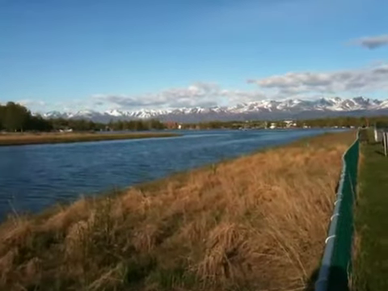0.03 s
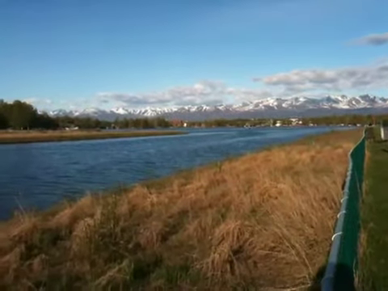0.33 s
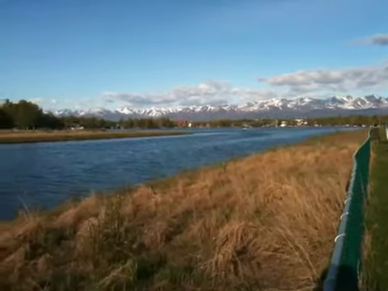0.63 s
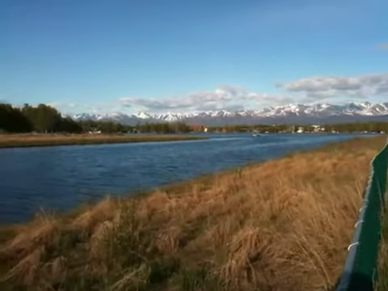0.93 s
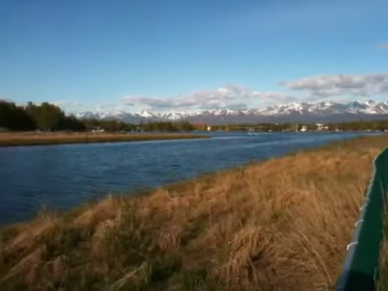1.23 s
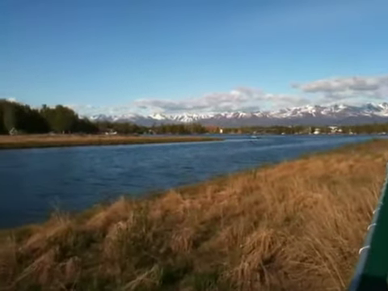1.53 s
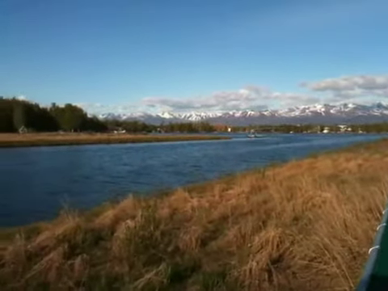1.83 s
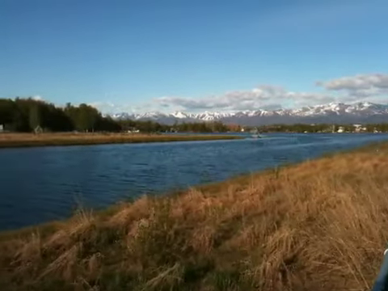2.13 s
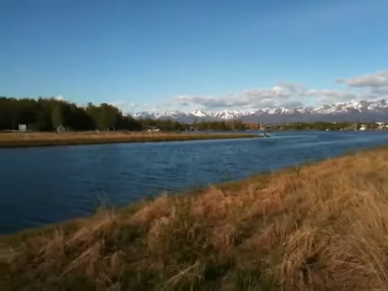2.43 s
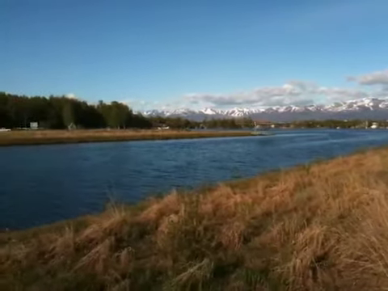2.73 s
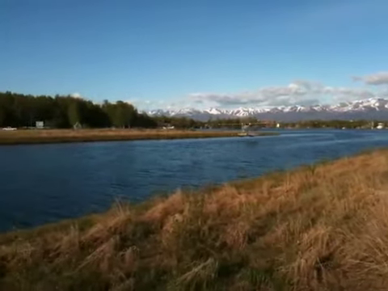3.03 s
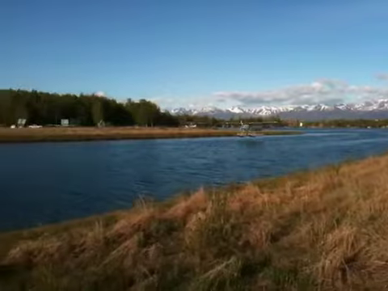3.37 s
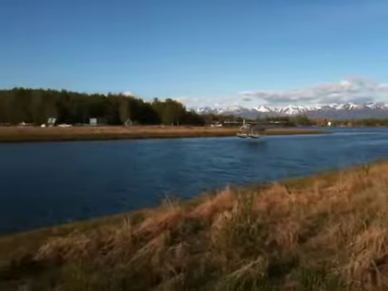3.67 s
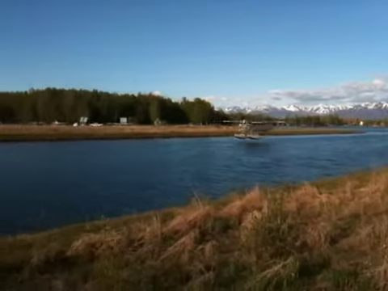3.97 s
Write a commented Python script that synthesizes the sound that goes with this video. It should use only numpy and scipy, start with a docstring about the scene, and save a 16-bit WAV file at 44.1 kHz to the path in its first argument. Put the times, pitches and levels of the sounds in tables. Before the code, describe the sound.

A floatplane's low engine hum and propeller hiss grow louder under thumping gusts of wind.

```python
"""A low engine drone, hit at once by puffs of wind on the microphone.
A small floatplane taxis nearer across a lake, easing its throttle; each firing pops in its exhaust pipe.
Propeller and spray hiss swells, pulsing with the engine. Another engine idles far off and fades.
Wind eddies rumble, crack and thump. Behind: open-air noise, one rustle of dry grass, one faint tick.
The camera adds a faint high whine."""
import sys
import numpy as np
from scipy import signal
from scipy.fft import rfft, irfft, next_fast_len
from scipy.io import wavfile
from scipy.ndimage import map_coordinates

SR = 44100
rng = np.random.default_rng(int(sys.argv[2]) if len(sys.argv) > 2 else 0)


def master(y):
    """Save y as 16-bit WAV."""
    cut = np.clip(np.atleast_2d(y).T, -1, 1)
    pcm = np.round(cut * 32767)  # scale
    wavfile.write(sys.argv[1], SR, pcm.astype(np.int16))


N = 176400

# plane's firing rate: t/s, f/Hz
FIRING_HZ = [(0, 105.2), (2.3, 103.5), (3.2, 101.9), (3.7, 99.6)]
# exhaust tones: multiple of the firing rate; level/dB re rumble
TONE_ORDERS = [1, 2, 8 / 3, 3, 4]
TONE_DB = [-8, 0.5, -14.5, -18, -17.5]
# exhaust gain as the plane nears: t/s, level/dB
APPROACH_DB = [(0, -54), (1, -50.5), (2, -49.5), (2.9, -47), (3.3, -44), (3.7, -41), (4, -41)]
# exhaust rumble spectrum: f/Hz, level/dB
EXHAUST_COLOUR = [(40, -46), (80, -25), (110, -2), (190, 3.5), (330, -12), (520, -7.5), (800, -5.5),
                  (1050, -16.5), (3000, -52)]
# far engine's tones: multiple of its firing rate, starting level/dB
IDLE_ORDERS = [(2, -50.5), (3, -61), (4, -57), (5, -57), (7, -63.5), (9, -61), (11, -65.5)]
# open-air and grass spectra: f/Hz, level/dB
AIR_COLOUR = [(40, -16), (130, 3.5), (500, 0), (800, -16.5), (1200, -6), (2500, -29.5), (11000, -41),
              (15500, -31)]
GRASS_COLOUR = [(1500, -11), (4500, 3), (8000, 1), (15000, -15)]
# grass rustle: centre t/s, half length/s, level/dB
GRASS_RUSTLE = (0.576, 0.11, -62.5)
# nearby tick: t/s, level/dB
NEAR_TICKS = [(3.425, -41)]
# wind puffs: centre t/s, length/s, level/dB, brightness/dB
WIND_PUFFS = [(0.064, 0.032, -29.5, -26), (0.554, 0.019, -37, -30), (0.754, 0.046, -27, -11),
              (1.043, 0.028, -30.5, -11.5), (1.12, 0.073, -28.5, -18), (1.235, 0.011, -27.5, -5),
              (1.274, 0.056, -28.5, -16.5), (1.32, 0.034, -25.5, -20), (1.405, 0.031, -26.5, -17),
              (1.528, 0.056, -35.5, -16), (1.762, 0.043, -30, -22), (1.86, 0.014, -32.5, -15),
              (2.041, 0.015, -29, -20), (2.165, 0.018, -25, -37), (2.201, 0.037, -27, -18),
              (2.292, 0.058, -29, -17.5), (2.351, 0.026, -24.5, -14.5), (2.395, 0.025, -28, -10),
              (2.453, 0.048, -26.5, -8.5), (2.545, 0.044, -30.5, -12), (2.623, 0.049, -29.5, -20),
              (2.714, 0.033, -29.5, -8), (2.902, 0.042, -38, -25), (3.391, 0.036, -26, -10.5),
              (3.445, 0.024, -24.5, -10), (3.528, 0.018, -28.5, -10.5), (3.635, 0.044, -25, -7.5)]
# spectra of a puff's layers: f/Hz, level/dB
BODY_COLOUR = [(25, -57), (75, -17), (120, 1), (180, 4.5), (260, 0), (400, -9.5), (800, -35.5), (2000, -80)]
EDGE_COLOUR = [(150, -22), (350, 7.5), (550, 8), (1100, -18.5), (1500, -39), (6000, -94)]
CRACK_COLOUR = [(550, 4), (950, 4.5), (1400, -8), (2200, -28.5), (5000, -45)]
# light buffeting between puffs: t/s, level/dB
BREEZE_DB = [(.9, -58.5), (1.5, -46.5), (2.5, -46), (2.8, -48.5), (3.06, -43.5), (3.25, -56.5),
             (3.55, -42.5), (4, -53)]
# hiss band envelopes: t/s, level/dB
MID_DB = [(0, -72.5), (.55, -72), (.7, -64.5), (1.2, -67.5), (1.55, -60), (2.5, -56), (3.2, -57),
          (3.45, -51), (4, -50.5)]
TREBLE_DB = [(.42, -72), (.85, -65), (1.4, -68.5), (1.58, -62), (1.75, -65), (2.02, -55.5), (2.4, -58),
             (2.9, -53), (3.03, -57), (3.55, -49), (3.78, -52.5), (4, -47.5)]
TOP_DB = [(.4, -77), (.7, -71), (1.65, -69.5), (2.07, -56), (2.38, -63), (2.53, -54.5), (2.62, -61.5),
          (2.92, -55), (3, -60.5), (3.3, -52), (3.68, -50.5), (3.78, -56), (4, -45.5)]
FIZZ_DB = [(1.6, -76.5), (3, -70), (3.4, -62.5), (4, -59.5)]
# hiss band spectra: f/Hz, level/dB
MID_BAND = [(600, -30), (1250, -0.5), (2200, 0.5), (2600, -8), (4500, -50)]
TREBLE_BAND = [(2200, -69), (3400, 2.5), (4600, 4), (5700, -6.5), (7500, -62)]
TOP_BAND = [(4800, -22), (6400, 2.5), (7400, 2.5), (9000, -12), (13000, -49)]
FIZZ_BAND = [(6500, -6), (9000, 1), (10700, -1), (12000, -5), (15500, -27)]
# hard buffets: onset t/s, level/dB, f/Hz
WIND_THUMPS = [(1.043, -22, 317), (1.089, -18, 208), (1.23, -28, 840), (1.277, -25, 770), (1.759, -20, 257),
               (2.446, -18, 604), (2.662, -15, 200), (2.681, -22.5, 326), (3.423, -15.5, 383),
               (3.472, -17, 197), (3.629, -14.5, 190)]


def amp(db):
    return 10 ** (np.asarray(db) / 20)


def unit_rms(x):
    return x / np.sqrt(np.mean(x ** 2) + 1e-20)


def time_s():
    return np.arange(N) / SR


def curve(rows):
    """(t/s, value) rows, interpolated per sample."""
    return np.interp(time_s(), *np.transpose(rows))


def wobble(rate_hz):
    """Smooth random curve through normal knots at rate_hz."""
    t = time_s()
    coarse_s = t[::32]
    knots = rng.standard_normal(N // 100)
    return np.interp(t, coarse_s, map_coordinates(knots, [coarse_s * rate_hz + 2]))


def filtered(x, gain_at_hz):
    size = next_fast_len(N + 8192)
    return irfft(rfft(x, size) * gain_at_hz(np.fft.rfftfreq(size, 1 / SR)), size)[:N]


def coloured(x, colour):
    """x shaped by (f/Hz, level/dB) rows, at rms 1."""
    hz, db = np.transpose(colour)
    return unit_rms(filtered(x, lambda f: amp(np.interp(np.log(f + 1), np.log(hz), db))))


def noise(colour):
    return coloured(rng.standard_normal(N), colour)


def tone(cycles, rms_db, waver_rad, waver_hz):
    """Sine with a random, wavering phase."""
    phase_rad = 2 * np.pi * (cycles + rng.random()) + waver_rad * wobble(waver_hz)
    return amp(rms_db) * np.sqrt(2) * np.sin(phase_rad)


def pops(firings, colour, scatter_db=6, pipe_t60_s=0.034, waver_db=2.5):
    """One uneven pulse per firing, ringing in the pipe, heard along two wavering paths."""
    onsets = np.flatnonzero(np.diff(np.floor(firings)))
    pulses = np.zeros(N)
    pulses[onsets] = amp(scatter_db * rng.standard_normal(len(onsets)))
    decay = amp(-60 * time_s()[:SR // 20] / pipe_t60_s)
    paths = rng.standard_normal((2, len(decay))) * decay
    ringing = sum(signal.fftconvolve(pulses, path)[:N] * amp(waver_db * wobble(20)) for path in paths)
    return coloured(ringing, colour)


def exhaust(firings, rush_share=0.71, rush_swing_db=2, waver_db=2):
    """Low engine orders over a rumble of pipe pops and noise that pulses with each firing."""
    tones = sum(tone(order * firings, db + waver_db * wobble(16), waver_rad=0.32, waver_hz=14)
                for order, db in zip(TONE_ORDERS, TONE_DB))
    ring = pops(firings, EXHAUST_COLOUR)
    pulsing = amp(rush_swing_db * np.cos(2 * np.pi * firings))
    rush = coloured(rng.standard_normal(N) * pulsing, EXHAUST_COLOUR)
    rumble = np.sqrt(1 - rush_share) * ring + np.sqrt(rush_share) * rush
    return amp(curve(APPROACH_DB)) * (tones + rumble)


def far_engine(firing_hz=55.34, fade_db_per_s=4, waver_db=4):
    """A fading idle whose tones waver on their way over the water."""
    t = time_s()
    firings = firing_hz * t + 0.055 * wobble(3.29)
    idle = np.zeros(N)
    for order, start_db in IDLE_ORDERS:
        level_db = start_db - fade_db_per_s * t + waver_db * wobble(4.86)
        idle += tone(order * firings, level_db, waver_rad=0.4, waver_hz=7.67)
    return idle


def shore(air_db=-57, tick_decay_s=0.0012):
    """Distant open-air noise; a grass rustle and a tick share one brighter noise."""
    t = time_s()
    centre_s, half_s, rustle_db = GRASS_RUSTLE
    rustle = amp(rustle_db + 2.2 * wobble(88.8)) * np.exp(-((t - centre_s) / half_s) ** 2)
    tick = sum(amp(db) * np.exp(-np.abs(t - at_s) / tick_decay_s) for at_s, db in NEAR_TICKS)
    return (rustle + tick) * noise(GRASS_COLOUR) + amp(air_db + wobble(3.76)) * noise(AIR_COLOUR)


def eddies(colour, window_s):
    """Turbulent noise, levelled over window_s so that the puff sets its strength."""
    turbulence = noise(colour)
    power = signal.fftconvolve(turbulence ** 2, np.hanning(int(window_s * SR)), "same")
    return unit_rms(turbulence / np.sqrt(np.abs(power) + 1e-9))


def wind(body_gain_db=-0.5, edge_gain_db=2.5, flutter_db=3, steepness=2.54):
    """Puffs buffet the microphone; sharper ones add a bright edge, the sharpest a crack."""
    t = time_s()
    body_power = amp(curve(BREEZE_DB) + 4.7 * wobble(27.91)) ** 2
    edge_power, crack_power = np.zeros((2, N))
    for centre_s, length_s, db, bright_db in WIND_PUFFS:
        span = slice(*np.searchsorted(t, [centre_s - 2 * length_s, centre_s + 2 * length_s]))
        offset = np.abs(2 * (t[span] - centre_s) / length_s)
        crest = np.exp(-(offset / 0.75) ** steepness)  # 3/4 of the body's length
        body_power[span] += amp(db) ** 2 * np.exp(-offset ** steepness)
        edge_power[span] += amp(db + bright_db) ** 2 * crest
        crack_power[span] += amp(db + 1.8 * bright_db) ** 2 * crest
    edge = amp(edge_gain_db) * np.sqrt(edge_power) * eddies(EDGE_COLOUR, window_s=0.031)
    crack = np.sqrt(crack_power) * eddies(CRACK_COLOUR, window_s=0.016)
    body = amp(body_gain_db) * np.sqrt(body_power) * eddies(BODY_COLOUR, window_s=0.034)
    return body + amp(flutter_db * wobble(130)) * (edge + crack)


def hiss(firings, pulse_db=1.5, flutter_db=0.8, waver_db=1.13, rasp_gain_db=-2):
    """Propeller wash and spray: four fluttering bands pulse with the engine; firings rasp in the mids."""
    firing_rad = 2 * np.pi * firings
    swing_db = pulse_db * (np.cos(2 * firing_rad) / 2 - np.cos(firing_rad))
    swing_db += 0.62 * np.sin(firing_rad / 2)  # every second firing
    swing_db -= 0.04 * np.sin(firing_rad * 2 / 3)  # blade passes
    rasp = amp(curve(MID_DB) + rasp_gain_db) * pops(firings, MID_BAND)
    bands = [(MID_DB, MID_BAND), (TREBLE_DB, TREBLE_BAND), (TOP_DB, TOP_BAND), (FIZZ_DB, FIZZ_BAND)]
    wash = np.zeros(N)
    for envelope_db, colour in bands:
        level_db = curve(envelope_db) + flutter_db * wobble(260) + waver_db * wobble(14)
        wash += amp(level_db) * noise(colour)
    return rasp + unit_rms(amp(swing_db)) * wash


def thumps(rise_cycles=0.6):
    """The hardest eddies shove the microphone; each swing dies within a few cycles."""
    t = time_s()
    shoves = np.zeros(N)
    for onset_s, db, hz in WIND_THUMPS:
        cycles = np.maximum(t - onset_s, 0) * hz
        rise = cycles / rise_cycles
        shoves += amp(db) * rise * np.exp(1 - rise) * np.sin(2 * np.pi * cycles)
    return shoves


def scene(mic_rolloff_hz=74):
    """Mono mix; the microphone drops the buffeting's deepest bass."""
    firings = np.cumsum(curve(FIRING_HZ)) / SR  # running count
    buffeting = filtered(wind() + thumps(), lambda f: 1 - np.exp(-(f / mic_rolloff_hz) ** 2))
    return (exhaust(firings) + hiss(firings) + far_engine() + buffeting + shore())[None]


def record(dry, whine_hz=(14970, 15030), whine_db=-90, cutoff_hz=15730):
    """The camera's two-tone whine and band limit."""
    whine = amp(whine_db) * np.sqrt(2) * sum(np.sin(2 * np.pi * hz * time_s()) for hz in whine_hz)
    return filtered(dry[0] + whine, lambda f: f < cutoff_hz)[None]


dry = scene()
out = record(dry)
master(out)
```